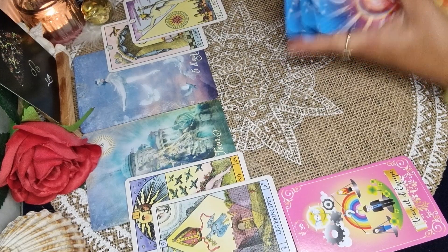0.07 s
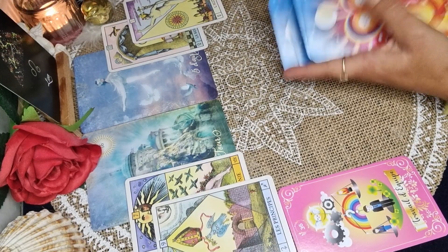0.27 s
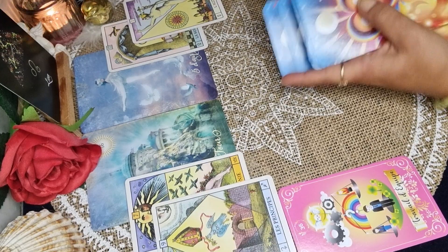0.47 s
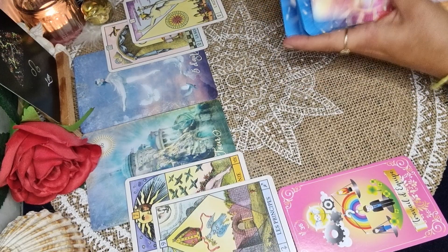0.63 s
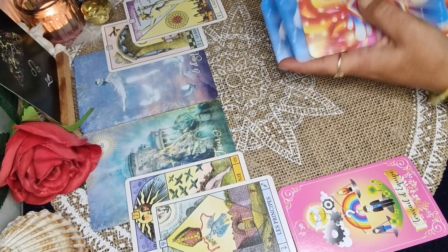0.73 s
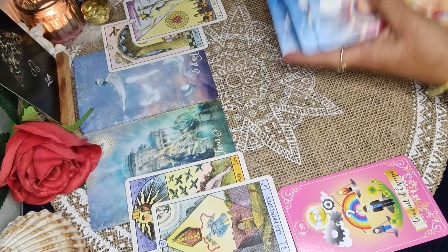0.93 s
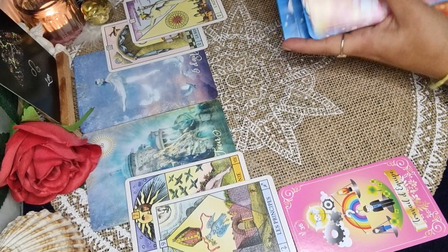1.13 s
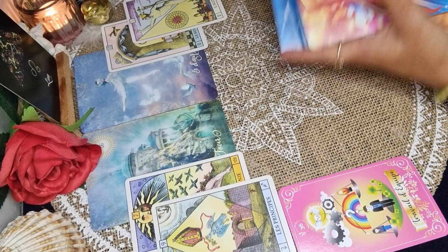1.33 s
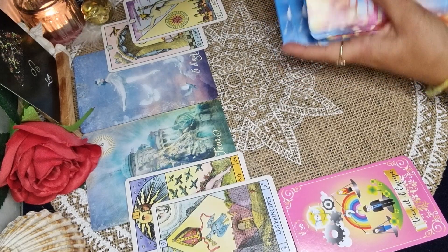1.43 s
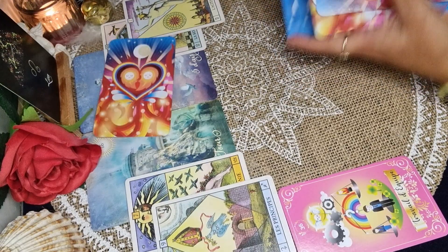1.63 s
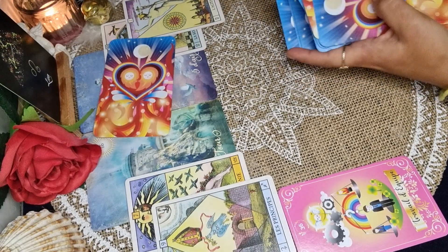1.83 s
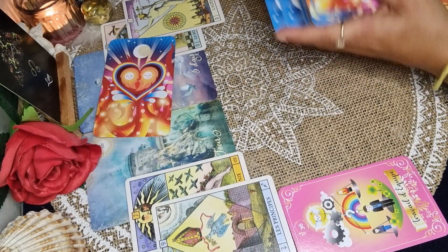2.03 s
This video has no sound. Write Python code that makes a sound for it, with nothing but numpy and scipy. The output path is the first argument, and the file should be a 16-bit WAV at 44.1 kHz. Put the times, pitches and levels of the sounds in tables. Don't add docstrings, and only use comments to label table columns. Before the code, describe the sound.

Brisk hand shuffling of a card deck, close and nearly mono: short rubbing swishes end in bright slaps and soft knocks, edges tick between, one loud sharp crack rings briefly, then quieter strokes follow in a hushed small room.

```python
import sys
import numpy as np
from scipy import signal
from scipy.fft import rfft, irfft
from scipy.io import wavfile
from scipy.ndimage import uniform_filter1d, minimum_filter1d

SR = 44100
rng = np.random.default_rng(int(sys.argv[2]) if len(sys.argv) > 2 else 0)


def generate_wav(sig):
    pcm = np.round(np.clip(np.atleast_2d(sig).T, -1, 1) * 32767).astype(np.int16)
    wavfile.write(sys.argv[1], SR, pcm)


def ratio_of_db(decibels):
    return 10 ** (np.asarray(decibels, float) / 20)


N = 92477

# pitch_hz, level_db
HUSH_SPECTRUM = [(18, -41), (30, -12.5), (962, -12), (1320, -13.5), (2680, -20), (4300, -17), (16000, -21)]
# pitch_hz, level_db
MICROPHONE = [(60, -14), (330, -0.5), (2000, 5), (3000, -3.5), (4500, 2), (6500, -0.5), (8800, -3.5),
              (12500, 2), (15500, -2)]
# pitch_hz, level_db
SIDE_SPECTRUM = [(60, -31), (250, -27), (600, -33), (1300, -29), (4000, -34), (9000, -23.5)]
# start_s, peak_db, pitch_hz, t60_s
TABLE_THUDS = [(0.044, -49, 131, 0.14), (0.148, -48, 124, 0.1), (0.27, -49, 70, .12), (.55, -36.5, 62, 0.1),
               (.70, -55, 133, 0.15), (.785, -45.5, 122, 0.14), (0.924, -51.5, 85, 0.092),
               (1.041, -51, 80, 0.11), (1.181, -48.5, 118, 0.085), (1.32, -50.5, 189, 0.14),
               (1.699, -51, 100, .12), (1.845, -53, 75, .1), (1.992, -53, 86, 0.17)]
# start_s, peak_db, pitch_hz
DECK_KNOCKS = [(.0079, -25, 1315), (.011, -19.5, 906), (0.0169, -36, 670), (0.025, -40.5, 700),
               (.152, -42.5, 1480), (0.175, -46, 1380), (.232, -41.5, 1230), (0.236, -38.5, 1550),
               (0.269, -36, 676), (.277, -39, 1000), (0.404, -49, 1020), (0.541, -42, 960),
               (0.5513, -37, 449), (.554, -39.5, 635), (.663, -50, 1300), (.707, -48.5, 2010),
               (.746, -47.5, 1520), (0.772, -41.5, 430), (.786, -35, 530), (.788, -37, 1580),
               (1.032, -40, 1420), (1.037, -34, 2140), (1.043, -40, 381), (1.299, -44, 1220),
               (1.3044, -41.5, 1220), (1.3055, -47, 736), (1.309, -43.5, 840), (1.317, -46, 454),
               (1.412, -47, 1390), (1.595, -40.5, 650), (1.629, -33, 1370), (1.632, -20.5, 1430),
               (1.64, -46.5, 2020), (1.648, -35, 1940), (1.652, -29, 1675), (1.657, -38, 1280),
               (1.665, -39, 920), (1.671, -60, 1090), (1.706, -45, 1500), (1.733, -53, 990),
               (1.849, -40, 1085), (1.852, -46, 1910), (1.855, -43.5, 318), (1.985, -47.5, 800),
               (2.021, -40, 900), (2.026, -39.5, 583)]
# start_s, peak_db, colour_hz
EDGE_TICKS = [(.029, -41, 14500), (0.196, -54, 3000), (.839, -53, 12000), (.845, -55, 13100),
              (.96, -58, 13500), (1.692, -53, 12000), (1.695, -51, 13000), (.075, -56, 14500),
              (.1381, -67, 13300), (.187, -62, 13500), (.2079, -46, 9000), (.387, -62, 13000),
              (.5736, -48, 15300), (.9951, -38, 14500), (1.278, -50, 15400), (1.5045, -41, 15500),
              (1.7913, -42, 15500), (0.343, -49, 14500), (0.4029, -46, 5500), (0.609, -53.5, 15400),
              (0.87, -53, 15100), (0.8889, -45, 15200), (0.9133, -49, 14300), (1.0986, -43, 14700),
              (1.1697, -57, 15400), (1.2104, -41.5, 14700), (1.334, -48, 14900), (1.35, -47.5, 15400),
              (1.3688, -48, 14700), (1.419, -48, 14700), (1.4624, -44.5, 15400), (1.7655, -56, 4380)]
# pitch_hz, level_db (per Hz)
RUB_SPECTRUM = [(1180, -43), (2000, -12.5), (4450, -4.5), (5210, -6.5), (6360, 0), (8550, -7),
                (16000, -0.5)]
# pitch_hz, level_db (per Hz)
SCRAPE_SPECTRUM = [(50, -27), (130, -10.5), (400, -8.5), (1000, -3.5), (2000, -6), (3000, -19)]
# start_s, end_s, start_db, end_db, dull_part_db
PACKET_LIFTS = [(.151, .178, -51, -55, 0), (.401, .436, -57, -57, 0), (.659, .69, -57, -61, 0),
                (.928, .956, -57, -58, 0), (1.099, 1.125, -58, -66, -5), (1.177, 1.203, -60, -56, 0),
                (1.412, 1.422, -53, -54, 0), (1.428, 1.455, -55, -54, -3), (1.704, 1.714, -60, -52, 3),
                (1.714, 1.738, -52, -57, 2), (1.985, 2.027, -49, -57, 1), (.727, .778, -54, -47, -3),
                (.576, .598, -59, -62, 0), (1.645, 1.672, -57, -58, 12), (.29, .34, -64, -64, 0)]
# start_s, end_s, start_db, end_db, dull_part_db
PACKET_DROPS = [(-.02, .013, -49.5, -42.5, -5), (.205, .25, -54.5, -48.5, -7.5),
                (.248, .263, -53, -56, -18), (.262, .2712, -41, -43.5, 1), (.465, .51, -59, -52, -4.5),
                (.508, .538, -49, -53, -3), (.777, .787, -47, -40, -2), (.972, .998, -61, -51, -2),
                (.997, 1.043, -51, -44, -5), (1.232, 1.3, -62, -48, -7.5), (1.49, 1.54, -66, -52.5, -1.5),
                (1.54, 1.595, -56.5, -46, -2), (1.772, 1.8, -63, -49, -3.5), (1.8, 1.847, -54.5, -45, -16)]
# start_s, peak_db,
# colour_hz, length_s
FACE_SLAPS = [(.007, -32, 6450, 0.0022), (.011, -28, 6350, 0.0027), (.2317, -31.5, 5000, 0.00098),
              (.2367, -35, 4500, 0.0021), (.2716, -19, 7560, 0.0015), (.2762, -40, 9000, 0.00091),
              (.430, -41.5, 9000, 0.0031), (.446, -38, 13000, 0.0015), (.509, -36.5, 12900, 0.003),
              (.5397, -22, 4500, 0.0023), (.5432, -36.5, 4500, 0.0044), (.5535, -33, 7400, 0.002),
              (.659, -44, 11000, 0.00077), (.662, -40.5, 6070, 0.00031), (.7025, -48, 11000, 0.0036),
              (.707, -47, 5950, 0.0025), (.7855, -23, 7500, 0.0035), (1.033, -33.5, 4630, 0.0059),
              (1.040, -34, 5560, 0.0015), (1.299, -33.5, 6700, 0.011), (1.318, -43.5, 5550, 0.0039),
              (1.384, -44.5, 7500, 0.0033), (1.4536, -40, 13100, 0.0011), (1.592, -48, 8800, 0.0018),
              (1.6238, -32, 12000, 0.0024), (1.630, -49, 12750, .002), (1.6395, -44, 13000, 0.0011),
              (1.649, -28, 6000, 0.0016), (1.6528, -26, 5500, 0.0014), (1.6648, -38, 9000, .0015),
              (1.8485, -33, 5550, 0.0073), (1.8545, -26, 7000, 0.00085), (1.9842, -42.5, 9300, 0.003)]
# pitch_hz, level_db, t60_s
SNAP_MODES = [(400, -10, 0.04), (891, -6.5, 0.039), (1363, 2, 0.018), (1743, -3, 0.016), (2063, -0.5, 0.01),
              (2490, -5, 0.0085), (3020, 0, 0.011), (4500, 5, 0.0094), (5740, 5.5, 0.012),
              (6870, 3, 0.0086), (10600, 5.5, .006), (12150, 0.5, 0.0059), (13800, 4.5, 0.0055)]

TICK_S = 0.00063
SNAP_S = 1.62087


def colour(x, points):
    hz, db = np.array(points, float).T
    bins_hz = np.maximum(np.fft.rfftfreq(2048, 1 / SR), 1)
    log_gain = np.interp(np.log(bins_hz), np.log(hz), db) * np.log(10) / 20
    cepstrum = irfft(log_gain)
    cepstrum[1:1024] *= 2
    cepstrum[1025:] = 0
    return signal.fftconvolve(x, irfft(np.exp(rfft(cepstrum))))[:N]


def butter(x, order, hz, kind):
    return signal.sosfilt(signal.butter(order, hz, kind, fs=SR, output="sos"), x)


def unit(x):
    return x / np.sqrt(np.mean(x ** 2))


def add(track, s, piece):
    i = max(int(s * SR), 0)
    track[i:i + len(piece)] += piece[:N - i]


def flicker(rate_hz, depth_db):
    k = int(SR / rate_hz)
    drift = uniform_filter1d(uniform_filter1d(rng.standard_normal(N), k), k)
    return ratio_of_db(depth_db * unit(drift))


def bursts(rows, width, broad):
    out, t = np.zeros(N), np.arange(800) / SR
    for s, db, hz, length in rows:
        attack = np.minimum(t / min(.29 * length, .0009), 1)
        noise = rng.standard_normal(800) * attack * np.exp(-(t / length) ** 2)
        peak = signal.iirpeak(min(hz, .4 * SR), 1 / width, fs=SR)
        coloured = signal.lfilter(*peak, signal.lfilter(*peak, noise))
        puff = coloured + broad * np.diff(noise, prepend=0)
        add(out, s, ratio_of_db(db) * puff / np.abs(puff).max())
    return out


def hush():
    level_db = -68
    return unit(colour(rng.standard_normal(N), HUSH_SPECTRUM)) * ratio_of_db(level_db) * flicker(5.6, 0.11)


def room(x):
    split_hz, build_up_s = 3900, 0.0039
    t = np.arange(SR // 2) / SR
    tail = 0
    for kind, t60, wet_db in [("low", 0.19, -18.5), ("high", 0.18, -49)]:
        part = butter(rng.standard_normal(len(t)), 2, split_hz, kind)
        part = part * ratio_of_db(-60 * t / t60) * np.minimum(t / build_up_s, 1)
        spectrum = rfft(part)
        power = np.abs(spectrum) ** 2
        even = spectrum * np.sqrt(uniform_filter1d(power, size=400) / uniform_filter1d(power, size=30))
        part = irfft(even) * (t < t60)
        tail = tail + ratio_of_db(wet_db) * part / np.sqrt(np.sum(part ** 2))
    return signal.fftconvolve(x, tail)[:N]


def table_thuds():
    attack_s = 0.0072
    out, t = np.zeros(N), np.arange(SR // 5) / SR
    for s, db, hz, t60 in TABLE_THUDS:
        boom = ratio_of_db(db - 60 * t / t60) * np.sin(2 * np.pi * hz * t)
        add(out, s, boom * np.minimum(t / attack_s, 1))
    return out


def crackle():
    per_s, floor_db = 45, -62
    draws = rng.random((int(per_s * N / SR), 3))
    rows = [(a * N / SR, floor_db + 5.2 * b, 6000 + 9000 * c, TICK_S) for a, b, c in draws]
    return bursts(rows, .7, .03)


def edge_ticks():
    return bursts([(*row, TICK_S) for row in EDGE_TICKS], 0.33, 0.047)


def deck_knocks():
    cycles = 6.4
    out, t = np.zeros(N), np.arange(3000) / SR
    for s, db, hz in DECK_KNOCKS:
        r = rng.standard_normal(2)
        modes = [(1, 1), (0.578 + 0.095 * r[0], .4), (1.796 + 0.11 * r[1], .6), (.18, .06)]
        ring = sum(g * np.sin(2 * np.pi * hz * k * t) * ratio_of_db(-60 * t * hz * k / cycles) for k, g in modes)
        ring *= 1 - np.exp(-t * hz * 4)
        add(out, s, -ratio_of_db(db) * ring / np.abs(ring).max())
    return out


def slides(rows, attack_s):
    release_s, rustle_db, rustle_s = .0032, -14, .028
    t, bright, dull = np.arange(N) / SR, np.zeros(N), np.zeros(N)
    for s, end, start_db, end_db, dull_db in rows:
        after = np.maximum(t - end, 0)
        settle = np.maximum(np.exp(-after / release_s), ratio_of_db(rustle_db) * np.exp(-after / rustle_s))
        onset = np.exp(-(np.maximum(s - t, 0) / attack_s) ** 2)
        env = ratio_of_db(np.interp(t, [s, end], [start_db, end_db])) * onset * settle
        bright = np.maximum(bright, env)
        dull = np.maximum(dull, env * ratio_of_db(dull_db))
    grains = rng.standard_normal(N) * ratio_of_db(1.45 * rng.standard_exponential(N))
    grit = grains * flicker(260, 1.42) * flicker(60, 1.3)
    scrape = rng.standard_normal(N) * flicker(173, 2.5)
    rub = colour(bright * unit(grit), RUB_SPECTRUM) * ratio_of_db(5)
    return rub + colour(dull * unit(scrape), SCRAPE_SPECTRUM) * ratio_of_db(6.5)


def face_slaps():
    return butter(bursts(FACE_SLAPS, 0.99, 0.34), 2, 2700, "high")


def snap():
    ring_db, crack_db, crack_cut_hz = 1, 9, 1300
    flex_db, flex_s = -13, .0006
    rattle_db, rattle_t60_s = -32.5, 0.14
    out, t = np.zeros(N), np.arange(4000) / SR
    ring = sum(ratio_of_db(db - 60 * t / t60) * np.sin(2 * np.pi * hz * t) * (1 - np.exp(-t * hz * 8.5))
               for hz, db, t60 in SNAP_MODES)
    click = np.exp(-t / .00004) - .13 * np.exp(-t / .0003)
    spray = rng.standard_normal(len(t)) * (.25 * np.exp(-t / .0005) + .03 * np.exp(-t / .003))
    crack = butter(click + spray, 2, crack_cut_hz, "high")
    add(out, SNAP_S, ratio_of_db(ring_db) * ring / np.abs(ring).max() + ratio_of_db(crack_db) * crack)

    t = np.arange(SR // 5) / SR
    rattle = unit(butter(rng.standard_normal(len(t)), 1, [600, 5000], "band"))
    rattle = rattle * ratio_of_db(rattle_db - 60 * t / rattle_t60_s) * flicker(240, 5.0)[:len(t)]
    add(out, SNAP_S, rattle)

    t = np.arange(N) / SR
    flex = np.sin(2 * np.pi * SNAP_MODES[3][0] * t) * np.exp(-np.abs(t - SNAP_S) / flex_s)
    return out + ratio_of_db(flex_db) * flex


def scene():
    hits = face_slaps() + edge_ticks() + deck_knocks() + table_thuds() + crackle()
    lifts = slides(PACKET_LIFTS, 0.00036)
    drops = slides(PACKET_DROPS, 0.0079)
    cards = lifts + drops + colour(hits, MICROPHONE)
    jump = colour(snap(), MICROPHONE)
    tail = room(cards + .17 * jump)
    cards = cards + jump
    mid = cards + tail + hush()
    skew = rng.standard_normal(900) * np.exp(-np.arange(900) / 128) / 8
    side = colour(np.convolve(cards, skew), SIDE_SPECTRUM) + ratio_of_db(-17) * hush()
    return np.array([mid + side, mid - side])


def low_pass(x):
    return signal.sosfilt(signal.butter(12, 17150, fs=SR, output="sos"), x)


def record(dry):
    ceiling_db, ratio, lookahead_s, recovery_db_s = -4, 20, .0105, 260
    dry = butter(dry, 2, 50, "high")
    dry = signal.sosfilt(signal.ellip(8, .3, 45, 15900, fs=SR, output="sos"), dry)
    k = int(lookahead_s * SR)
    over = np.maximum(np.abs(dry).max(axis=0) / ratio_of_db(ceiling_db), 1)
    wanted_db = 20 * np.log10(over ** (1 / ratio - 1))
    ahead_db = minimum_filter1d(wanted_db, k, origin=-(k // 2))
    ramp_db = recovery_db_s * np.arange(N) / SR
    gain_db = np.minimum.accumulate(ahead_db - ramp_db) + ramp_db
    gain = uniform_filter1d(ratio_of_db(gain_db), k // 5)
    return low_pass(dry * gain)


dry = scene()
out = record(dry)
generate_wav(out)
```